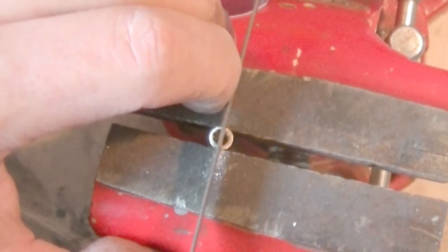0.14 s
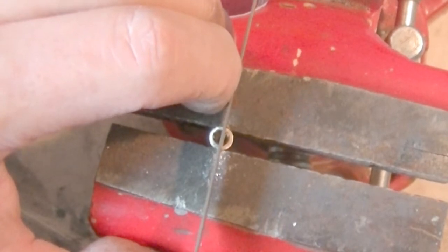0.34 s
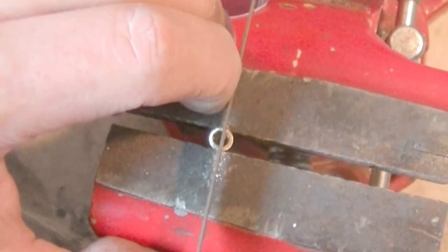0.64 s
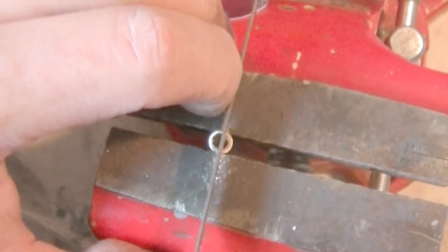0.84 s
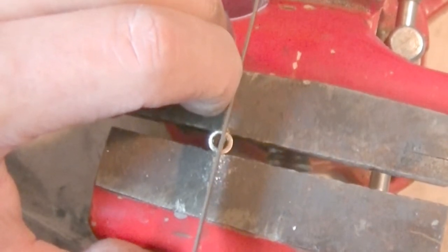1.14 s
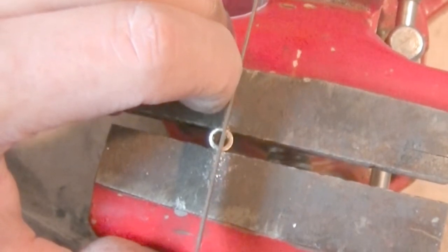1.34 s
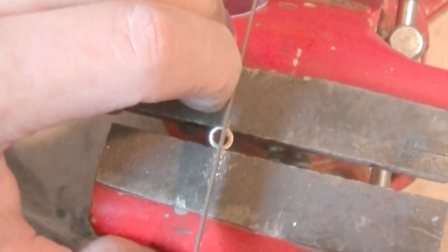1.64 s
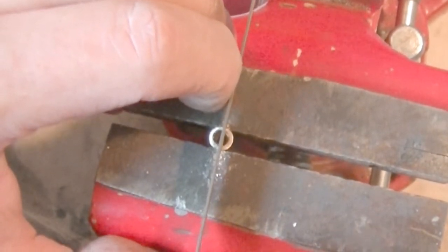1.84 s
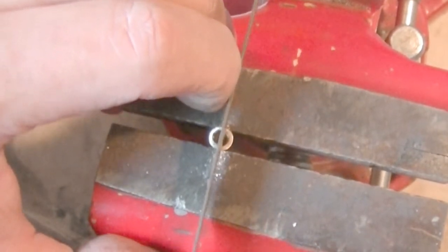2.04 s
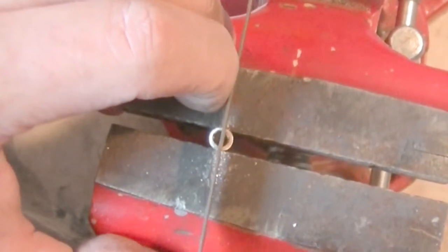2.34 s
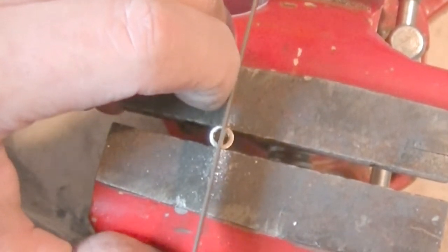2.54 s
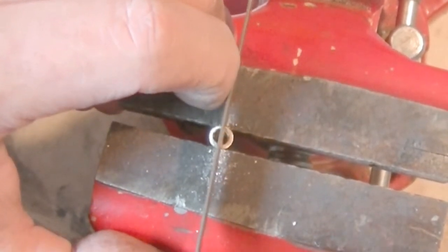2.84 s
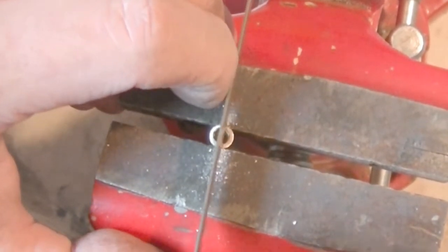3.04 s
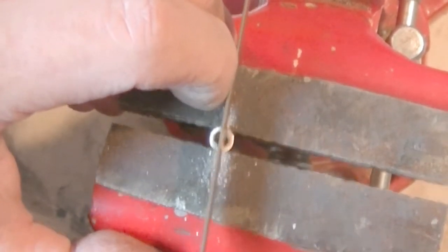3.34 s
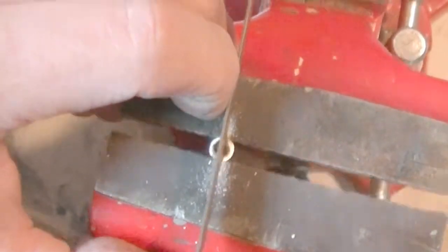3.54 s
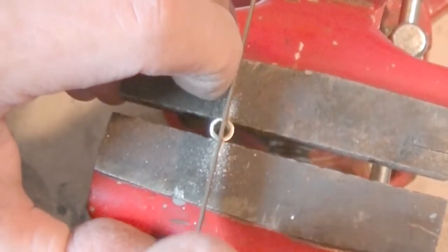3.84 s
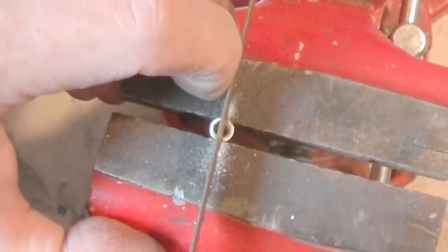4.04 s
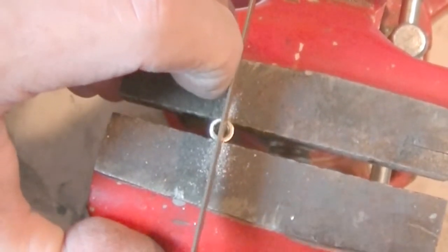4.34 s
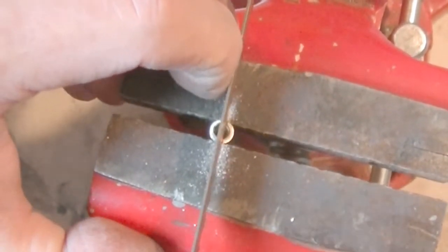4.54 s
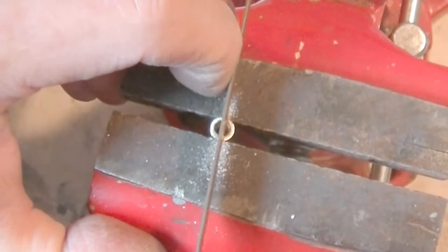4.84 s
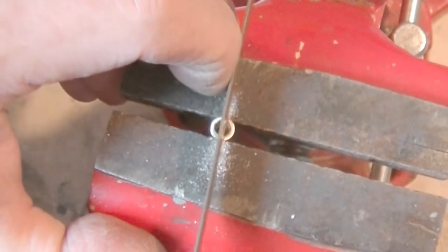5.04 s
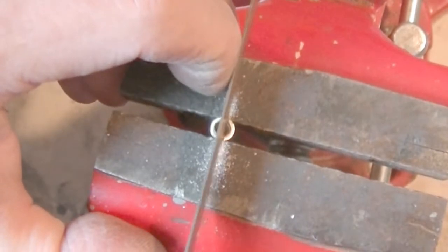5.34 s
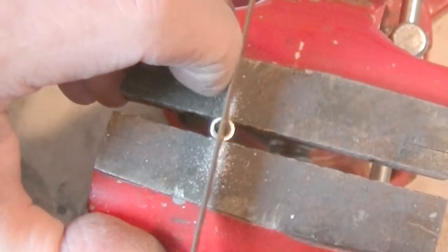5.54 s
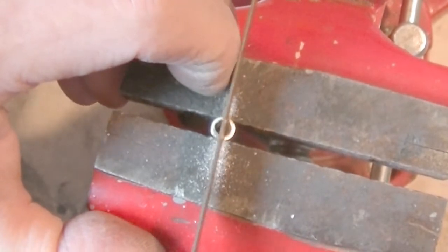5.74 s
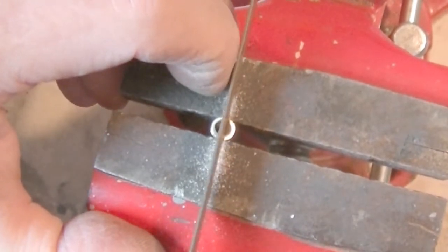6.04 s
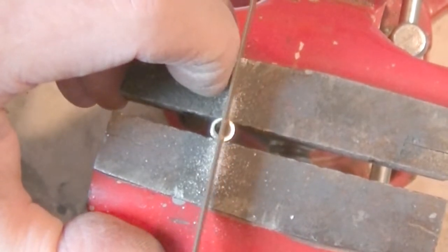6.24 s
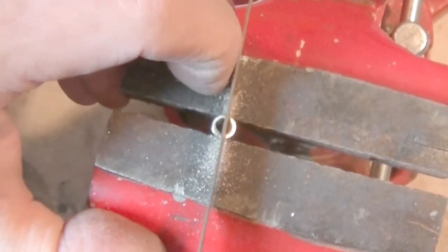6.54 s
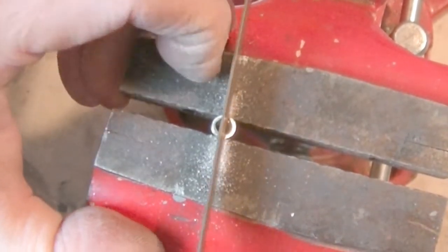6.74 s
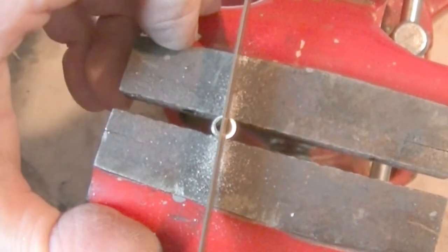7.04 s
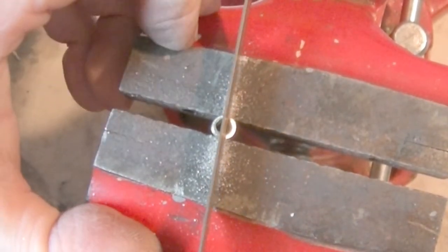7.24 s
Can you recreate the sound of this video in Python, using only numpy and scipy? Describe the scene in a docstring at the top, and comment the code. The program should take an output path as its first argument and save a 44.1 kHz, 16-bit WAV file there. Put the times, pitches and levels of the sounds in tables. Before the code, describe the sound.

In a quiet workshop, close to the microphone, a fine saw scrapes and catches on a small metal tube clamped in a vise, with clicks and a clear tap. After a near pause, the sawing suddenly speeds up eightfold into rapid bright chirps and gritty flutter with snapping jams. At the end it drops back to natural speed with a faint scrape and tap.

```python
"""A fine hand saw cuts a small metal tube held in a vise, heard close by in a quiet workshop.
Chips and tooth impacts excite the resonances of vise and blade; jams, taps and snags add clicks and thuds.
The start and the end run at natural speed; the long middle passage is sped up eightfold, so that strokes
flutter, the teeth sing and vise, room and floor all sit three octaves higher."""
import sys
import numpy as np
from scipy import signal
from scipy.fft import rfft, irfft
from scipy.io import wavfile

SR = 44100
rng = np.random.default_rng(int(sys.argv[2]) if len(sys.argv) > 2 else 0)


def materialize(psi):
    """Save the field psi as 16-bit PCM at rate SR to the path in sys.argv[1].

    A 1-D psi becomes a single channel; in a 2-D psi each row is a channel.
    """
    bounded = np.clip(np.atleast_2d(psi).T, -1, 1)
    quanta = np.round(bounded * 32767).astype(np.int16)
    wavfile.write(sys.argv[1], SR, quanta)


N = 326340
T = np.arange(N) / SR
SPEED_UP, FAST_FROM_S, FAST_TO_S = 8, 1.968, 6.877
IS_FAST = (T > FAST_FROM_S) & (T < FAST_TO_S)

# Resonances of vise, bench and frame as heard sped up: [f/Hz, width/Hz, relative level/dB]
VISE = [(372, 33, -6.5), (824, 56, 2.5), (1344, 61, -7), (1652, 32, 0.5), (2102, 126, -0.5), (2900, 162, 1),
        (3858, 175, -4.5), (4890, 490, -2), (6370, 62, -22), (7700, 204, -2.5), (8310, 230, -11),
        (9960, 780, -3), (11670, 210, -10), (12440, 190, -10), (13250, 450, -16), (15400, 180, -5.5)]
# Resonances of blade and tube at natural speed: [f/Hz, width/Hz, relative level/dB]
BLADE = [(2035, 52, -2), (2765, 400, -11), (3200, 24, -16), (4130, 120, -15), (5600, 77, -11),
         (6440, 106, -10.5)]
# Spectrum of the shop air at natural speed, also of the dull bench: [f/Hz, relative level/dB]
FLOOR = [(12, -20), (20, -17.5), (91, 8), (124, -7), (273, 1), (440, -5.5), (479, -2.5), (583, -8),
         (13600, -24.5), (16500, -45)]


def amp(db):
    """Logarithmic level: decibels to amplitude gain."""
    return 10 ** (np.asarray(db) / 20)


def rms_one(x):
    """Normalization of the effective value: scale to rms 1."""
    return x / np.sqrt(np.mean(x ** 2) + 1e-20)


def low_pass(x, hz):
    """Second-order Butterworth low-pass: a gentle loss of treble."""
    return signal.sosfilt(signal.butter(2, hz, fs=SR, output="sos"), x)


def wobble(hz):
    """Band-limited random modulation: rms 1, changing about hz times a second."""
    return rms_one(low_pass(rng.standard_normal(N), hz))


def arch(count, top_at):
    """Warped half-sine: rises from 0 to 1 at the given share of its length and falls back."""
    along = np.linspace(0, 1, count) ** (np.log(.5) / np.log(np.clip(top_at, .1, .9)))
    return np.abs(np.sin(np.pi * along))


def colour(x, spectrum, speed=1):
    """Spectral weighting by a (f/Hz, level/dB) table; a speed-up moves it up in pitch."""
    hz, level_db = np.transpose(spectrum)
    grid = np.maximum(np.arange(N // 2 + 1) * SR / N, 1)
    gain_db = np.interp(np.log(grid), np.log(hz * speed), level_db)
    return irfft(rfft(x) * amp(gain_db), N)


def modes(x, table, speed=1, widen=1, shift_db=0, gains_db=None):
    """Modal superposition: parallel resonances whose strengths shift with blade contact and depth of cut."""
    out = 0
    depth = (T - FAST_FROM_S) / (FAST_TO_S - FAST_FROM_S) - .5
    for k, (hz, width, level_db) in enumerate(table):
        radius = np.exp(-np.pi * width * widen * speed / SR)
        angle = 2 * np.pi * hz * speed / SR
        contact_db = shift_db * wobble(hz=13.0) if shift_db else 0
        drive = x * amp(level_db + contact_db) + 1e-18
        if gains_db is not None:
            drive = drive * amp(gains_db[k] * depth)
        poles = [1, -2 * radius * np.cos(angle), radius * radius]
        ringing = signal.lfilter([1 - radius, 0, radius - 1], poles, drive)
        out = out + (-1) ** k * ringing  # alternating signs
    return out


def grit(per_s, spread_db):
    """Random impulse process: chips of metal tear off, a few much larger than the rest."""
    sizes = amp(spread_db * np.minimum(rng.exponential(1, N), 4)) * rng.choice([-1, 1], N)
    return rms_one(sizes * (rng.random(N) < per_s / SR))


def blows(table, t60):
    """Impact excitation: a sharp click with an exponentially dying rattle for each (t/s, peak/dB)."""
    out = np.zeros(N)
    tail = np.arange(int(t60 * SR))
    for s, peak_db in table:
        at = round(s * SR)
        burst = amp(peak_db - 60 * tail / (t60 * SR)) * rng.standard_normal(len(tail))
        burst[0] = 2.24 * amp(peak_db)  # the click
        out[at:at + len(tail)] += burst[:N - at]
    return out


def bright_body(x):
    """Radiation of the treble: upper vise modes at natural pitch and the broad rasp."""
    # Broad rasp at natural speed: [f/Hz, relative level/dB]
    slow_rasp = [(290, -49), (500, 4), (872, -2.5), (2070, -4), (5750, -14), (13600, -25.5), (16500, -46)]
    ringing = modes(x, VISE[9:], 1 / SPEED_UP, widen=1.7)
    return amp(-6) * ringing + amp(-4.0) * colour(x, slow_rasp)


def deep_body(x):
    """Low-frequency excitation: a soft push into the lower vise modes and the dull bench."""
    soft = low_pass(x, hz=286)
    ringing = modes(soft, VISE[:7], 1 / SPEED_UP, widen=1.5)
    return ringing + amp(-15.5) * colour(soft, FLOOR)


def slow_drags():
    """Stick-slip friction: teeth catch one by one in an uneven chatter; the vise modes rumble."""
    # Slow drags of the blade: [t/s, rise/s, hold/s, fall/s,
    # relative levels/dB of rasp, blade ring, rumble and the hum of one vise mode]
    drag_table = [(0, 0.018, 0.1, 0.32, -36.5, -38, -36, -60),
                  (0.161, .11, 0.18, 0.031, -39, -43.5, -36.5, -70),
                  (0.443, 0.024, 0.045, 1.5, -88, -74, -54, -82),
                  (1.564, 0.049, .04, 0.16, -39.5, -58, -42, -64),
                  (1.861, 0.034, 0.015, 0.08, -44, -60, -36.5, -70),
                  (6.868, .012, 0.0095, 0.062, -46, -63, -54, -54),
                  (6.919, 0.18, 0.045, .22, -41.5, -51, -40.5, -40.5)]
    edge_db = 20  # gained over the rise, lost over the fall
    gains = 0
    for s, rise, hold, fall, *levels_db in drag_table:
        before = (s + rise - T) / rise
        after = (T - s - rise - hold) / fall
        away = np.maximum(np.maximum(before, after), 0)
        gains = gains + amp(levels_db)[:, None] * amp(-edge_db * np.minimum(away, 6))
    rasp, ring, rumble, hum = gains

    chatter = amp(2.5 * wobble(hz=45))
    chips = grit(per_s=2500, spread_db=3.5) * chatter
    out = rasp * rms_one(bright_body(chips)) + rumble * rms_one(deep_body(chips))
    out += ring * rms_one(modes(chips, BLADE, shift_db=4.0))
    out += hum * rms_one(modes(chips, VISE[6:7], 1 / SPEED_UP, widen=3.5))
    return out


def slow_taps_and_snags():
    """Impulse response: taps and snagging teeth ring blade and vise; taps also shake the bench."""
    # Single teeth snag in the first drags: [t/s, relative peak/dB]
    snag_table = [(0.029, -27), (0.0445, -18.5), (0.0847, -22), (0.1386, -31), (0.2399, -32), (0.26, -28.5),
                  (0.2738, -22), (0.2892, -27), (0.3207, -32), (0.3565, -37), (0.3716, -19.5),
                  (0.4004, -30), (0.4176, -28), (0.4577, -41)]
    # Taps of the saw on tube and jaws: [t/s, relative peak/dB, thud above that peak/dB]
    tap_table = [(0.557, -46, -34), (0.615, -28.5, -1.5), (0.72, -45, -2), (0.762, -14.5, -15),
                 (1.137, -45.5, -37), (1.299, -38, -3.5), (1.48, -45, -14), (1.888, -34, -22),
                 (1.908, -33.5, 1.5), (6.883, -34.5, -2), (7.112, -26, -32), (7.347, -48, -6)]
    crack = blows([(s, db) for s, db, _ in tap_table], t60=0.054)
    # The bench shakes on after the click
    thud = blows([(s, db + thud_db) for s, db, thud_db in tap_table], t60=0.15)
    snags = blows(snag_table, t60=0.018)
    blade = modes(amp(10.5) * crack + amp(18) * snags, BLADE, widen=1.26)
    bright = bright_body(amp(11) * crack + amp(7.5) * snags)
    return blade + bright + amp(26) * deep_body(thud)


def shop_air():
    """Partially correlated noise: a steady, wide floor that is sped up along with the saw."""
    mid, side = rng.standard_normal((2, N))
    air = mid + 0.53 * side * [[1], [-1]]
    slow = amp(-52.5) * rms_one(colour(air, FLOOR))
    fast = amp(-51.5) * rms_one(colour(air, FLOOR, SPEED_UP))
    return np.where(IS_FAST, fast, slow)


def stroke_motion():
    """Kinematics of the hand: its speed swells and falls in each stroke, setting tooth rate and level."""
    # Sped-up strokes: [t/s, nominal length/s, relative level/dB, top tooth rate f/Hz]
    strokes = [(1.971, .012, -25.5, 1000), (2.006, 0.045, -31, 1630), (2.093, 0.014, -19, 1170),
               (2.103, 0.033, -19, 2400), (2.136, 0.028, -20.5, 860), (2.173, 0.01, -26, 3200),
               (2.181, .057, -25, 1170), (2.252, 0.048, -17.5, 2900), (2.307, 0.046, -23, 1190),
               (2.365, 0.028, -26.5, 1560), (2.422, 0.0082, -19.5, 1600), (2.44, 0.01, -17.5, 1050),
               (2.46, .013, -25.5, 1800), (2.514, 0.013, -32.5, 2240), (2.541, 0.038, -21.5, 3540),
               (2.588, 0.069, -25, 1230), (2.686, 0.017, -22.5, 1400), (2.705, 0.028, -19.5, 2500),
               (2.736, 0.057, -25, 1300), (2.818, 0.019, -24, 1000), (2.84, 0.028, -33, 950),
               (2.87, 0.033, -26.5, 2700), (2.914, 0.043, -20, 3100), (2.962, 0.046, -25, 1330),
               (3.019, 0.039, -20.5, 1770), (3.067, 0.039, -24, 1730), (3.115, .033, -19.5, 2240),
               (3.16, 0.035, -21.5, 1820), (3.203, 0.023, -18, 1830), (3.216, 0.032, -20, 2080),
               (3.246, 0.039, -21, 2140), (3.294, .009, -25.5, 2650), (3.305, .031, -19, 1940),
               (3.339, 0.038, -23.5, 1800), (3.39, 0.029, -19, 1500), (3.409, 0.055, -25.5, 1420),
               (3.471, .042, -23.5, 1780), (3.52, 0.045, -23, 1700), (3.582, 0.014, -23.5, 2250),
               (3.607, .024, -21, 2100), (3.632, 0.029, -22.5, 950), (3.66, 0.015, -27.5, 1650),
               (3.698, 0.026, -27.5, 860), (3.774, 0.013, -27, 1170), (3.816, .036, -37.5, 1900),
               (3.855, .009, -43, 2430), (3.873, .014, -26, 1200), (3.902, .011, -34, 4050),
               (3.944, .015, -38, 1220), (3.966, .011, -42, 1500), (3.987, .011, -22.5, 1160),
               (3.992, .014, -32.5, 2000), (4.011, .012, -24.5, 1500), (4.077, 0.017, -29, 1240),
               (4.131, .011, -36, 2020), (4.157, .024, -29.5, 1960), (4.286, 0.008, -36, 1450),
               (4.303, 0.044, -25, 1100), (4.373, 0.032, -27, 1000), (4.448, .026, -32, 1530),
               (4.487, .049, -20.5, 1300), (4.542, .032, -22, 1200), (4.585, .01, -21, 1320),
               (4.61, .011, -34, 1200), (4.624, 0.025, -23.5, 930), (4.688, 0.022, -31, 2330),
               (4.703, 0.036, -18, 1300), (4.745, 0.047, -24.5, 1300), (4.799, 0.047, -23, 2200),
               (4.852, 0.041, -26.5, 2250), (4.897, 0.044, -26.5, 2500), (4.948, .034, -24, 2300),
               (4.991, 0.038, -23, 2670), (5.032, 0.033, -25.5, 2300), (5.075, 0.033, -19, 2900),
               (5.115, 0.031, -24, 2230), (5.155, 0.035, -20, 2560), (5.194, 0.037, -24, 2600),
               (5.239, 0.03, -19.5, 2860), (5.274, 0.04, -23, 2520), (5.314, 0.031, -18.5, 1930),
               (5.351, 0.033, -25.5, 2260), (5.392, .03, -18.5, 3170), (5.426, 0.034, -23, 1400),
               (5.466, .031, -22, 2930), (5.504, 0.03, -23.5, 2600), (5.542, 0.029, -19, 3080),
               (5.575, 0.036, -25, 3700), (5.616, .028, -21.5, 3000), (5.648, .033, -24.5, 3000),
               (5.69, 0.027, -22, 3440), (5.719, 0.034, -25, 3000), (5.761, 0.029, -18.5, 3050),
               (5.795, .03, -22, 3000), (5.834, .029, -18, 3030), (5.868, .03, -22, 3300),
               (5.905, 0.032, -21.5, 3100), (5.94, 0.035, -23, 2800), (5.981, 0.027, -20.5, 3150),
               (6.016, 0.031, -23, 3150), (6.054, 0.028, -23, 3220), (6.089, .032, -26.5, 3200),
               (6.13, .023, -23, 2950), (6.159, 0.028, -27.5, 3300), (6.197, 0.03, -23, 3140),
               (6.235, 0.022, -28.5, 3300), (6.268, 0.025, -21, 2670), (6.301, 0.027, -26, 2800),
               (6.338, 0.031, -20, 3300), (6.366, 0.033, -25, 3340), (6.407, 0.032, -25.5, 2200),
               (6.446, 0.029, -23, 990), (6.483, 0.0097, -37, 2130), (6.493, .06, -26, 2150),
               (6.56, .024, -23, 1040), (6.59, 0.025, -27, 3040), (6.623, 0.029, -26, 2780),
               (6.651, 0.024, -27.5, 1050), (6.683, 0.019, -24.5, 3100), (6.708, 0.029, -29, 2870),
               (6.736, 0.02, -25.5, 3150), (6.765, 0.016, -23.5, 2800), (6.79, .022, -26, 1000),
               (6.814, 0.02, -27, 3000), (6.843, .017, -26, 3000), (6.869, 0.018, -39, 1130)]
    # How the cut sounds as it deepens:
    # [t/s, tooth tone on the push (0-1), tooth tone on the pull (0-1), relative treble/dB]
    cut = [(1.97, 0.18, 0.2, -1), (2.9, 0.12, .2, -2), (3.06, 0.5, .6, 4), (3.199, 0.13, .2, -2.5),
           (3.5, 0.48, 0.4, 3.5), (3.8, .25, 0.3, -3.5), (4.65, 0.25, 0.28, -2), (4.861, 0.34, 0.95, 3.5),
           (5.12, 0.37, .85, 0.5), (5.25, 0.41, 0.49, 1.5), (5.7, 0.6, 0.22, 2.5), (6.0, .45, .4, 2.3),
           (6.3, 0.53, .5, 4), (6.451, .2, .1, -2), (6.6, .35, 0.4, 2), (6.87, 0.07, .3, 2)]
    steady_from_s = 4.7  # from here push and pull alternate without a break
    # Shares of the stroke: pushes speed up late, pulls start fast
    loudest_at, fastest_push_at, fastest_pull_at, fastest_uneven_at = 0.53, .65, 0.35, .48
    teeth_per_s, level, tone = np.zeros((3, N))
    at, push_tone, pull_tone, treble_db = np.transpose(cut)
    treble = amp(np.interp(T, at, treble_db) + 3.0)
    pushing = True
    for s, length, level_db, top_rate in strokes:
        a = round((s - .003) * SR)
        b = a + round((length + .005) * SR)
        if s < steady_from_s:
            fastest_at = fastest_uneven_at
        else:
            fastest_at = fastest_push_at if pushing else fastest_pull_at
        clean = np.interp(s, at, push_tone if pushing else pull_tone)
        swell = arch(b - a, loudest_at)
        teeth_per_s[a:b] = top_rate * (.48 + .52 * arch(b - a, fastest_at))
        level[a:b] = amp(level_db - 5.5) * swell ** 0.62
        tone[a:b] = np.clip(clean, 0, 1) * swell ** 0.26
        pushing = s < steady_from_s or not pushing
    return teeth_per_s, level, tone, treble


def fast_jams():
    """Sudden release: the blade catches and jerks free with a crack, a direct snap and a vise knock."""
    # Sped-up jams: [t/s, relative peak/dB]
    jams = [(1.969, -26), (2.094, -21.5), (2.137, -10), (2.422, -27), (2.44, -10), (2.463, -11),
            (2.685, -16), (2.708, -1), (2.823, -24), (2.85, -2.5), (3.151, -11), (3.309, -2.5), (3.39, -14),
            (3.418, 0.5), (3.583, -12), (3.612, 1.4), (3.739, -17), (4.135, -31), (4.2, -24.5),
            (4.258, -18), (4.444, -20), (4.688, -1.5), (6.507, 1.8)]
    # Spectrum of the snap: [f/Hz, relative level/dB]
    snap_spectrum = [(300, -39), (900, -13), (2500, 0.5), (8000, -10), (16000, -16.5)]
    crack = amp(-6) * low_pass(blows(jams, t60=0.021), hz=9300)
    # The vise's knock grows more slowly than the crack
    thud = blows([(s, 6 + 0.66 * db) for s, db in jams], t60=0.037)
    knock = modes(amp(-5.5) * thud, VISE[1:6], widen=1.42)
    snap = amp(-5) * colour(blows(jams, t60=0.036), snap_spectrum)  # heard straight from the blade
    return crack, knock, snap


def fast_saw():
    """Periodic tooth impact: the tooth rate sets a singing pitch and pulses the chips that drive the vise."""
    # Response between the modes: [f/Hz, relative level/dB]
    fast_rasp = [(120, -78), (200, -55), (372, -22), (693, -15), (817, -22), (999, -14.5), (2110, -5),
                 (6940, -13), (12000, -13), (15800, -16)]
    # Change of each vise mode from first stroke to last: [gain/dB]
    deeper_db = [-2.5, -3, -4, -5.5, -0.5, 4, 3.5, 0.5, 21, 5, -1, 3, -6, -6, -7, 8]
    teeth_per_s, level, tone, treble = stroke_motion()
    uneven_rate = teeth_per_s * (1 + .07 * wobble(hz=300))  # teeth are not set quite evenly
    phase = 2 * np.pi * np.cumsum(uneven_rate) / SR
    song = (np.sin(phase) + .4 * np.sin(2 * phase)) * amp(4 * wobble(hz=150))
    song = tone * level * song

    # Each tooth tears its own burst
    chips = level * grit(per_s=14000, spread_db=4.0) * (1 + 0.28 * np.cos(phase))
    low = low_pass(chips, hz=5000)
    crack, knock, snap = fast_jams()
    push = low + treble * (chips - low) + 0.72 * song + crack

    ringing = modes(push, VISE, widen=0.74, shift_db=3.0, gains_db=deeper_db)
    body = amp(7) * (ringing + amp(-1.0) * colour(push, fast_rasp))
    direct_song = amp(1.0) * song * teeth_per_s / 2500  # louder at higher tooth rates
    return body + knock + direct_song + snap


def room(x, speed, near_db, far_db):
    """Convolution with reflections: close ones off the bench differ between sides, a noise tail dies behind."""
    near_t60_s, far_t60_s = .15, 0.2  # at natural speed
    near, shared, own = rng.standard_normal((3, SR // speed))
    age = np.arange(SR // speed) * speed / SR
    sides = np.array([[1], [-1]])
    near = amp(near_db) * rms_one(near * amp(-60 * age / near_t60_s)) * sides
    far = amp(far_db) * rms_one(amp(-60 * age / far_t60_s) * (shared + 0.46 * own * sides))
    response = (near + far) / np.sqrt(len(age))
    return x + signal.fftconvolve(x[None], response, axes=1)[:, :N]


def scene():
    """Superposition: each passage with its room, joined by hard cuts, over the shop air."""
    slow = room(slow_drags() + slow_taps_and_snags(), 1, near_db=-24, far_db=-13)
    fast = room(fast_saw(), SPEED_UP, near_db=-25, far_db=-20)
    saw = np.where(IS_FAST, fast, slow)
    return (saw + shop_air()) * amp([[.25], [-.25]])  # slightly louder on the left


def record(dry):
    """Soft saturation and band limiting: peaks are rounded, the top is cut."""
    rounded = 1.286 * np.tanh(dry / 1.748)
    top_cut = signal.cheby2(24, 55, 16150, fs=SR, output="sos")  # order, stopband/dB, edge/Hz
    return signal.sosfilt(top_cut, rounded)


dry = scene()
out = record(dry)
materialize(out)
```